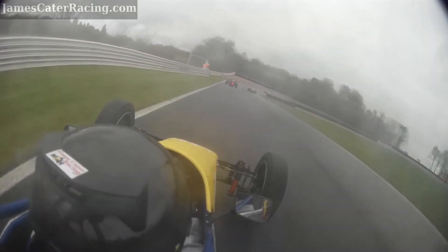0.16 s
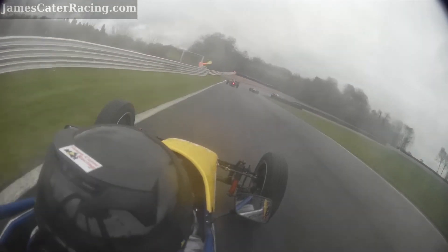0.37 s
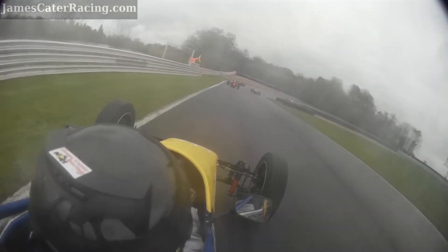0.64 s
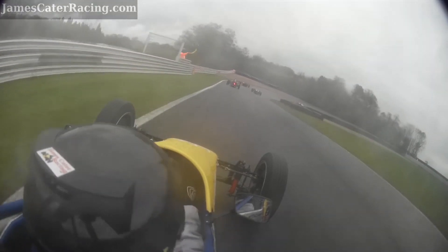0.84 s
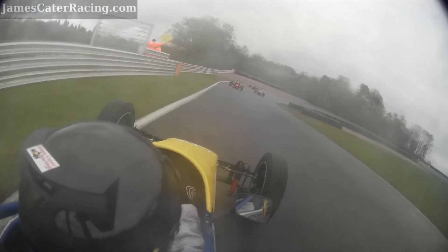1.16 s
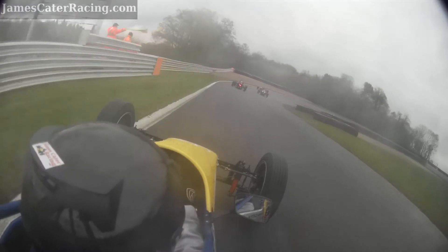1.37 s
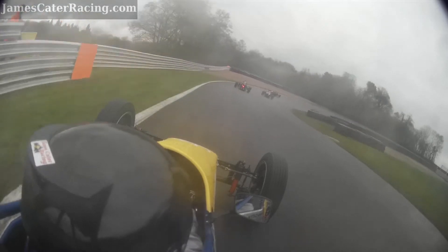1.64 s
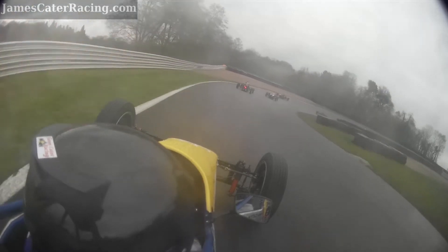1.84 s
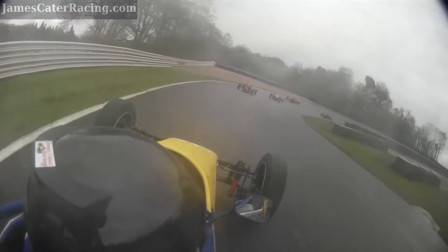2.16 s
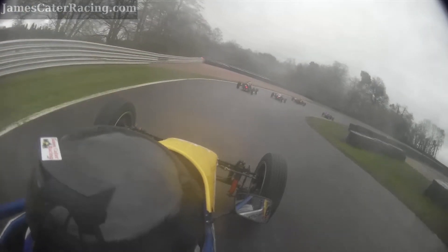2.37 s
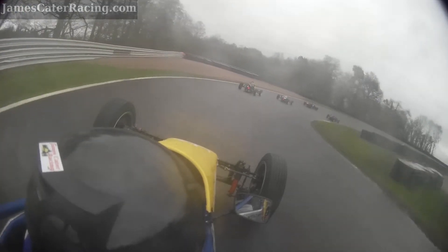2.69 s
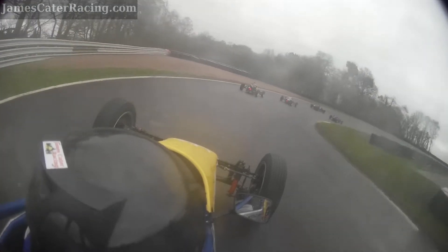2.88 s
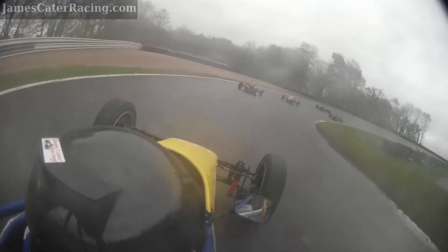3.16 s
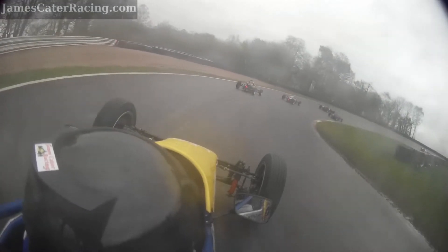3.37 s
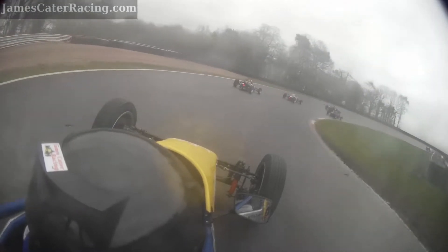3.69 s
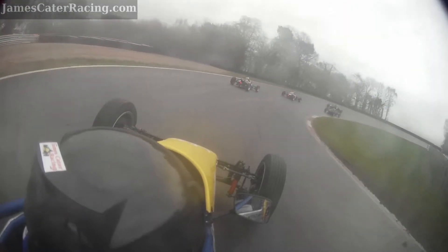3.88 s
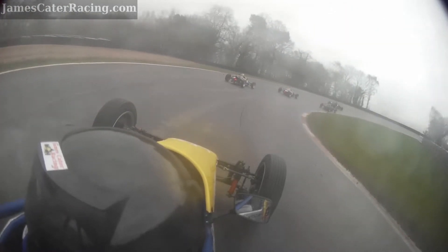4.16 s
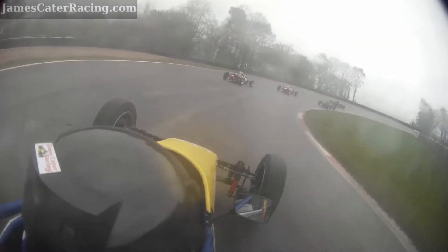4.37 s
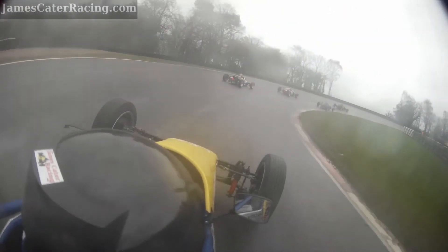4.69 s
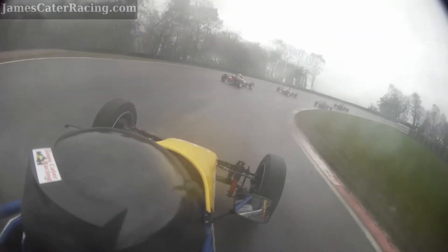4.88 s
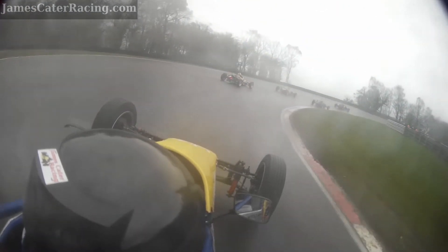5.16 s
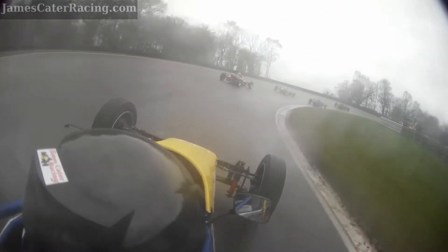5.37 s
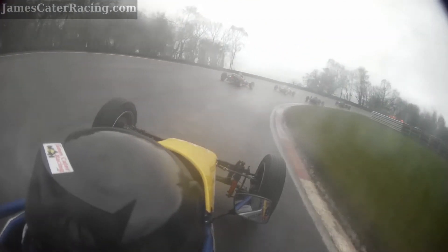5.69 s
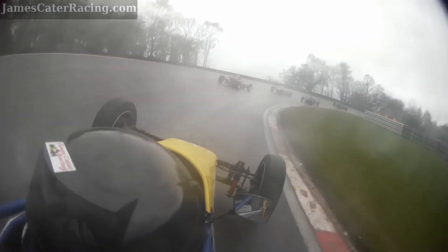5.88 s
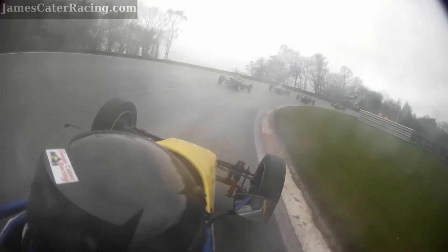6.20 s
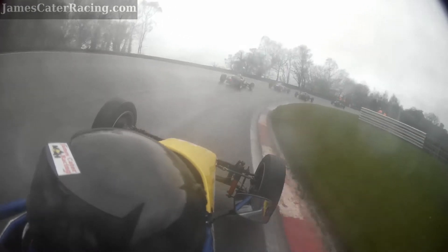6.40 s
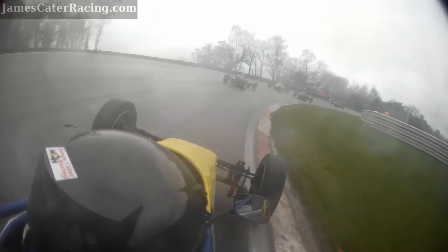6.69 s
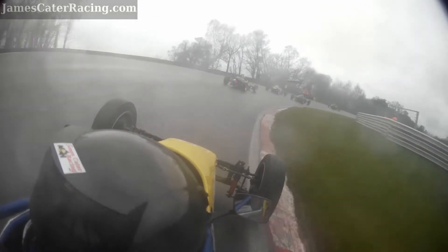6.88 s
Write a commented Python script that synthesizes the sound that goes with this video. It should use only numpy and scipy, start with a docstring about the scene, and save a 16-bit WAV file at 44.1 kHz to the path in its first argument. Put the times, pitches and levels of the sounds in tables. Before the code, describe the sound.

Onboard a single-seater on wet tarmac, a raspy four-cylinder flares, sinks on closed throttle, then growls gradually back up under power.

```python
"""Wet-track single-seater, on board

A four-cylinder air-cooled engine blips for a downshift, runs down on a nearly shut throttle, then pulls out
of the bend. Sine orders locked to the engine cycle ring the mount, frame and a closed camera case.
Resonant noise adds road rumble, frame shake, case buzz, valve hiss and spray; low gusts, knocks and a
grit tick sit around them. Two ports hear it almost alike, apart from the treble."""
import sys
import numpy as np
from scipy import signal
from scipy.fft import rfft, irfft
from scipy.io import wavfile
from scipy.ndimage import uniform_filter1d

SR = 44100
rng = np.random.default_rng(int(sys.argv[2]) if len(sys.argv) > 2 else 0)


def to_wav(sig):
    """Store sig (one row per channel, or 1-D mono) as 16-bit WAV at the path in sys.argv[1].

    Samples outside -1..1 are clipped; the rate is SR.
    """
    pcm = np.clip(np.atleast_2d(sig), -1, 1) * 32767
    pcm = np.round(pcm).astype(np.int16)
    wavfile.write(sys.argv[1], SR, pcm.T)  # frames by channels


N = 310464

# strong engine orders, keyed by multiple of the cycle:
# coasting_db, extra_half_throttle_db, extra_full_throttle_db
STRONG_ORDERS = {4: (-16.5, -1.6, -2.3), 5: (-29.5, 2.5, 3.3), 18: (-25.5, 0.83, 2.6), 22: (-32.5, -1, 1),
                 26: (-21, -8, -1), 30: (-27, -2, 0.), 32: (-27, 1, 1), 43: (-28.5, -5, -4),
                 39: (-24.5, 0., -8), 40: (-24, -8, -9), 6: (-29.5, 2.2, 9.5), 8: (-23.5, 4.3, 8.2),
                 9: (-29, 0., 4.24), 10: (-32, 10.6, 1.6), 11: (-27.5, 0., 0.), 12: (-21, -3.5, 1.8),
                 13: (-28, -1, 9.1), 14: (-31, 10.4, 3.7), 15: (-27, 3.7, 3.9), 16: (-23.5, -12, -2.2),
                 20: (-28.5, 0., 2), 21: (-27, -5, -2), 24: (-26.5, 2.5, -12), 25: (-35.5, 4.6, 0.),
                 27: (-30, -2, 0.), 29: (-24.5, -2, 3), 33: (-20.5, 2, -5)}
# weak orders, first the even (once a turn), then the odd (once a cycle):
# coasting_db, slope_db_per_octave of revs, extra_full_throttle_db
WEAK_ORDERS = [(-35.5, 10, 5), (-31.5, 5.5, -1)]
# how hard some weak orders shake the mount, keyed by multiple of the cycle: extra_db
WEAK_ACCENTS = {3: 4.7, 7: -1.2, 17: -1, 19: -1, 23: 1, 28: 0., 31: 2, 34: 4.3, 35: 3.1, 36: -8, 37: 2.8,
                38: 0, 41: 4.9, 42: -9}
# rev bands where a strong order booms or cancels: order (multiple of the cycle), firing_hz, width_hz, lift_db
REV_BOOMS = [(4, 137, 56, 9), (4, 112, 5, -8.5), (6, 147, 26, 10.5), (9, 144, 10, 7), (32, 108.7, 7.5, 7),
             (30, 108, 6, 3), (8, 143.5, 13.2, 14.5), (8, 138, 4.2, 3.5), (4, 105, 8, 2),
             (9, 115.97, 10, 4), (10, 129.5, 15.3, 11), (11, 139, 21, 5), (12, 130.6, 47, 5.5),
             (13, 130.96, 31.7, 12), (14, 143.3, 21, 14.5), (16, 101, 11, 5), (20, 129.2, 18, 17.5),
             (21, 139, 15, 4), (24, 140.6, 19, 10.5), (29, 113.4, 12.5, 6.5), (12, 160, 7.5, -8),
             (25, 133, 10, 19), (22, 140, 18, 15.5), (22, 122, 14, 13), (32, 100.5, 7.9, 8.5),
             (30, 104, 10, 3), (30, 111, 5, -4), (27, 140, 11, 13.5), (26, 82, 13, 4.5),
             (33, 105.5, 4.4, -9), (29, 108.2, 5, 5), (5, 138, 52, -17), (5, 101.5, 8.2, 4), (32, 98, 4, 3),
             (29, 105.5, 2.7, 2), (33, 102.04, 9, -0.5), (21, 110, 7.4, 5), (27, 100, 14, 9)]
# strong orders lifted by the free blip before the clutch bites, keyed by multiple of the cycle: extra_db
BLIP_LIFTS = {4: 3.5, 8: 6, 9: 8.5, 10: 17, 11: 9, 12: 8, 13: 7, 29: 4, 30: 6, 32: 7, 33: 5}
BLIP_S, BLIP_LENGTH_S = 0.13, 0.081
# where the exhaust drives the frame harder or softer than the road does:
# pitch_hz, width_hz, coasting_db, extra_full_throttle_db
EXHAUST_DRIVE = [(169, 12, 1.5, -3.5), (225, 14, 3.5, -11), (255.5, 17, 1, 3), (356.3, 30, -0.5, 6),
                 (380, 102, 2, -0.5), (671, 80, -3, -3), (775, 97, 2, -1)]
# resonances of chassis and mount: pitch_hz, width_hz, level_db
MOUNT_MODES = [(61, 99, -16), (135.7, 45, -14), (162.5, 36, -8.5), (211.3, 29, -1), (246, 60, -0.5),
               (288, 64, -4.5), (347.6, 54.3, -.5), (436, 153, -14.5)]
# resonances of the frame tubes: pitch_hz, width_hz, level_db
FRAME_MODES = [(590, 54, -14.5), (669.4, 203, -12), (823, 163, -15), (931.5, 104, -18)]
# resonances of the camera case: pitch_hz, width_hz, level_db
CASE_MODES = [(1222, 88, -3.5), (1354, 246, -6), (1612, 210, -3.5), (1798, 156, 1), (2073, 370, -9)]
CASE_PASS_DB = -14.5  # how much of the engine orders the case passes on
BLOCK = 64  # samples between updates of the orders' path


def engine(fire_hz, cycle, throttle, wander_db=2.0, firm_db=0.83, uneven_db=1.77, slip_rad=0.13, loose_rad=0.22):
    """Sines at multiples of the four-stroke cycle, each wandering in level and phase, ring the structure."""
    t = np.arange(N) / SR
    out = np.zeros(N)
    block_throttle = throttle[::BLOCK]
    for order in range(2, 44):
        drift, wobble = walk(14), walk(9)
        firing_order = order % 4 == 0

        if order in STRONG_ORDERS:
            db, half_db, full_db = STRONG_ORDERS[order]
            drive_db = db + np.interp(throttle, [0, .5, 1], [0, half_db, full_db])
            drive_db += (firm_db if firing_order else uneven_db) * wobble
            drive_db += BLIP_LIFTS.get(order, 0) * hump(t, BLIP_S, BLIP_LENGTH_S)
            for boom_order, centre_hz, width_hz, lift_db in REV_BOOMS:
                if boom_order == order:
                    drive_db += lift_db * hump(fire_hz, centre_hz, width_hz)
        else:
            drive_db = law(*WEAK_ORDERS[order % 2], fire_hz, throttle)
            drive_db += WEAK_ACCENTS.get(order, 0) + wander_db * wobble

        hz = order * fire_hz[::BLOCK] / 4
        exhaust_db = sum((db + full_db * block_throttle) * hump(hz, centre_hz, width_hz)
                         for centre_hz, width_hz, db, full_db in EXHAUST_DRIVE)
        through_frame = ring(hz, MOUNT_MODES + FRAME_MODES)
        through_case = undb(CASE_PASS_DB) * ring(hz, CASE_MODES)
        path = np.repeat(np.hypot(through_frame, through_case) * undb(exhaust_db), BLOCK)[:N]

        # the two turns differ in timing: orders between the firing orders sit part of a wave off,
        # and the square term spreads the orders' peaks through the cycle
        start_waves = (0, 3 / 8, 3 / 16, 3 / 8)[order % 4] + order * order / 90
        drift_rad = loose_rad if not firing_order and order < 16 else slip_rad
        phase = 2 * np.pi * (order * cycle + start_waves) + drift_rad * drift
        out += np.sqrt(2) * path * undb(drive_db) * np.sin(phase)
    return out


# resonances that colour the valve hiss: pitch_hz, width_hz, level_db
SHELL_MODES = [(2850, 540, 1.5), (3595, 406, 3.5), (4763, 650, 2.5), (5180, 116, 0.5)]


def structure_shake(cycle, road_db, frame_db, case_db, hiss_db):
    """Road rumble in the mount, shake in the frame, buzz in the case and valve hiss above it."""
    out = shake(cycle, road_db, MOUNT_MODES, throb=0.029, flicker_db=0.3, repeat=.1)
    out += shake(cycle, frame_db, FRAME_MODES, throb=0.088, flicker_db=0.0, repeat=.38, firing=0.7, turn=0.83)
    out += shake(cycle, case_db, CASE_MODES, throb=0.083, flicker_db=0.98, repeat=.33)
    out += shake(cycle, hiss_db, SHELL_MODES, throb=0.13, flicker_db=0.77, repeat=.3, firing=.4, turn=0.53)
    return out


def shake(cycle, level_db, modes, throb, flicker_db, repeat, firing=1, turn=0.3):
    """Noise that throbs with each cycle, turn and firing, part of it repeating, rings a set of resonances."""
    each_turn = turn * np.cos(4 * np.pi * cycle)
    each_firing = firing * np.cos(8 * np.pi * cycle)
    gate = 1 + throb * (np.cos(2 * np.pi * cycle) + each_turn + each_firing)
    # repeat is the share of the noise power that follows the cycle
    drive = np.sqrt(repeat) * clatter(cycle) + np.sqrt(1 - repeat) * rng.standard_normal(N)
    flicker = undb(flicker_db * (walk(22.11) + .5 * walk(6)))
    return undb(level_db) * unit(rung(gate * flicker * drive, modes))


def clatter(cycle, keep=0.91, steps=2048):
    """Valve-gear and gear noise: a pattern replayed each cycle that changes gradually between cycles."""
    fresh = rng.standard_normal((int(cycle[-1]) + 1, steps))
    pattern = signal.lfilter([1], [1, -keep], fresh, axis=0, zi=fresh[:1])[0]
    return unit(pattern.ravel()[(cycle * steps).astype(int)])


# colour of the spray hissing past the case: pitch_hz, width_hz, level_db
SPRAY_MODES = [(5900, 500, 0.5), (7050, 1760, -1), (8700, 900, -11.5), (9920, 1640, -8.5),
               (13200, 960, -50)]


def spray(level_db, flicker_db=0.84):
    """Water thrown up by the tyres: smooth high noise whose level flickers on its own."""
    return undb(level_db + flicker_db * walk(9.5)) * unit(rung(rng.standard_normal(N), SPRAY_MODES))


# short knocks in the frame: start_s, level_db, pitch_hz
FRAME_KNOCKS = [(3.752, -11, 210.1), (4.6005, -10, 790), (5.038, -13, 750.2), (6.763, -16, 800),
                (6.806, -14, 800)]
KNOCK_TURNS = 3.6  # swings in a knock


def knocks():
    """Each knock is a few soft-edged sine swings of a frame tube."""
    t = np.arange(N) / SR
    out = np.zeros(N)
    for start_s, level_db, hz in FRAME_KNOCKS:
        half_s = KNOCK_TURNS / hz / 2
        out += undb(level_db) * hump(t, start_s + half_s, half_s) * np.sin(2 * np.pi * hz * (t - start_s))
    return out


# grit striking the case: start_s, level_db
GRIT_HITS = [(1.3938, -8)]
# what a grain of grit rings: pitch_hz, level_db, t60_s
GRIT_MODES = [(3830, -6, 0.0043), (4900, -9, 0.0022), (7270, -4, 0.0052), (8550, -7, 0.0033),
              (10000, -7, .0025), (11000, -8, 0.0022), (12400, -14, .003)]


def ticks(rise_s=0.0004):
    """A hard grain rings the case as decaying sines for a few milliseconds."""
    out, t = np.zeros(N), np.arange(600) / SR
    tone = sum(undb(db) * np.exp(-np.log(1000) * t / t60_s) * np.sin(2 * np.pi * hz * t)
               for hz, db, t60_s in GRIT_MODES)
    tone *= (t / (t + rise_s)) ** 2  # softened onset
    tone /= np.abs(tone).max()
    for start_s, level_db in GRIT_HITS:
        start = int(start_s * SR)
        out[start:start + 600] += undb(level_db) * tone
    return out


def wind(level_db, gust_db=0.5):
    """Low buffeting on the case: band-passed noise in gusts."""
    band = signal.butter(1, [50, 80], "band", fs=SR, output="sos")
    low = signal.sosfilt(band, rng.standard_normal(N))
    return undb(level_db + gust_db * walk(8.1)) * unit(low)


# engine speed: time_s, firing_hz
ENGINE_REVS = [(0.0, 88.64), (0.06, 91.94), (0.11, 100.9), (0.16, 111.6), (0.2, 127.7), (0.25, 146.7),
               (0.32, 145.7), (0.39, 143.4), (0.55, 139.5), (0.71, 137.4), (0.96, 133), (1.12, 131.5),
               (1.97, 112.2), (2.05, 112.3), (2.13, 110.5), (2.22, 110.1), (2.38, 107.84), (2.48, 105.6),
               (2.63, 103), (2.87, 102.1), (3.19, 98.2), (3.41, 96.76), (3.56, 96.57), (3.67, 97.54),
               (3.75, 96.06), (4.25, 96.94), (4.43, 98.5), (4.52, 98.9), (4.95, 102.6), (5.17, 103.3),
               (5.27, 105.2), (5.38, 104.4), (5.74, 105.7), (6.15, 107.8), (6.45, 109.3), (6.75, 111.2),
               (7.02, 112.6)]
# throttle nearly shut through the braking, fed in past the apex: time_s, opening (0-1)
THROTTLE_MOVES = [(0, 0.07), (3.4, 0), (3.9, 0.53), (4.6, 0.66), (5.3, 0.97), (6.2, 0.89), (7.04, 0.9)]
CLUTCH_S = .25  # from here the wheels turn with the engine


def driving():
    """Firing rate, cycle count, throttle, and road speed expressed as a firing rate."""
    fire_hz = curves(ENGINE_REVS)[0]
    throttle = np.clip(curves(THROTTLE_MOVES)[0], 0, 1)
    cycle = np.cumsum(fire_hz / 4) / SR  # four firings a cycle
    wheel_hz = np.where(np.arange(N) / SR < CLUTCH_S, fire_hz[int(CLUTCH_S * SR)], fire_hz)
    return fire_hz, cycle, throttle, wheel_hz


# brief swells and dips of the shake: centre_s, level_db, length_s
SHAKE_JOLTS = [(0.05, -3.5, 0.098), (0.177, -2.5, 0.063), (0.253, 2.5, 0.042), (0.346, -0.5, 0.088),
               (0.55, 0.5, 0.12), (2.173, 0.8, 0.06), (2.395, -2.5, 0.043), (2.82, 2.5, 0.15),
               (3.37, -2, 0.047), (3.7, 2.5, 0.065), (4.132, 2, 0.17), (4.286, -2.5, 0.041),
               (5.47, -1, 0.16)]
# case buzz, valve hiss and spray: base_db, slope_db_per_octave of road speed, extra_full_throttle_db
CASE_LAW = (-29, 10.2, -1.7)
HISS_LAW = (-39.5, 12.1, 1.08)
SPRAY_GROWTH = (-49.5, 11.7, 1.7)
HISS_BITE = .5  # throttle opening from which the hiss gets its full throttle lift
# standing water at the end of the fast approach lifts the spray, then thins
WATER_DB, WATER_FADE_S = 3.5, 1


def shake_levels(throttle, wheel_hz):
    """Jolts, case buzz, valve hiss and spray in decibels, following road speed and throttle."""
    t = np.arange(N) / SR
    jolt_db = sum(db * hump(t, centre_s, length_s) for centre_s, db, length_s in SHAKE_JOLTS)
    case_db = law(*CASE_LAW, wheel_hz, throttle) + jolt_db
    hiss_db = law(*HISS_LAW, wheel_hz, np.minimum(throttle / HISS_BITE, 1)) + jolt_db
    spray_db = law(*SPRAY_GROWTH, wheel_hz, throttle) + WATER_DB * hump(t, 0, WATER_FADE_S)
    return jolt_db, case_db, hiss_db, spray_db


REF_HZ = 100  # firing rate at which levels are given


def law(db, db_per_octave, throttle_db, hz, throttle):
    """A level in decibels that follows speed by the octave and throttle in proportion."""
    return db + db_per_octave * np.log2(hz / REF_HZ) + throttle_db * throttle


def side_noise(frame_db, case_db, hiss_db, spray_db):
    """Faint independent noise in each resonant colour that sets the two ports apart."""
    out = np.zeros(N)
    for level_db, modes in ((case_db - 31.5, CASE_MODES), (hiss_db - 24.5, SHELL_MODES),
                            (spray_db - 29, SPRAY_MODES), (frame_db - 51.5, FRAME_MODES)):
        out += undb(level_db) * unit(rung(rng.standard_normal(N), modes))
    return signal.sosfilt(signal.butter(4, 560, "high", fs=SR, output="sos"), out)


# tone balance of the two ports: pitch_hz, left_minus_right_db
PORT_BALANCE = [(880, 0), (1000, -.6), (2070, -1.2), (3500, -1.1), (4100, -.5), (4800, -1.2), (5600, -.4),
                (7500, 0)]


def ports(mid, apart):
    """Each port tilts the shared vibration by half the balance and takes the side noise in opposite sign."""
    hz = np.fft.rfftfreq(N, 1 / SR)
    balance_hz, balance_db = np.transpose(PORT_BALANCE)
    tilt_db = np.interp(np.log(hz + 1), np.log(balance_hz), balance_db) / 2
    return np.array([irfft(rfft(mid) * undb(way * tilt_db), N) + way * apart for way in (1, -1)])


def undb(db):
    """Decibels to gain."""
    return 10 ** (np.asarray(db) / 20)


def unit(x):
    """Scale to rms 1."""
    return x / np.sqrt(np.mean(x ** 2))


def curves(table):
    """Columns of a time table, one value a sample."""
    s, *columns = np.transpose(table)
    return [np.interp(np.arange(N) / SR, s, column) for column in columns]


def hump(x, centre, width):
    """1 at the centre, falling away on both sides."""
    return np.exp(-(2 * (x - centre) / width) ** 2)


def ring(hz, modes):
    """Gain of a set of steep resonances, summed in power, at the given frequencies."""
    return np.sqrt(sum((undb(db) / (1 + (2 * (hz - centre_hz) / width_hz) ** 2)) ** 2
                       for centre_hz, width_hz, db in modes))


def rung(x, modes):
    """A sound heard through a set of resonances."""
    return irfft(rfft(x) * ring(np.fft.rfftfreq(N, 1 / SR), modes), N)


def walk(rate):
    """Random levels held for 1 / rate seconds, smoothed twice and scaled to rms 1."""
    k = int(SR / rate)
    held = np.repeat(rng.standard_normal(N // k + 1), k)
    return unit(uniform_filter1d(uniform_filter1d(held, k), k)[:N])


# what the track feeds in: time_s, road_rumble_db, frame_shake_db, wind_buffeting_db
TRACK = [(0, -20.5, -18.5, -26), (.15, -19, -17.5, -38), (.3, -18, -22.5, -38), (1.1, -22.5, -24, -34),
         (2, -21.5, -25, -41), (3, -20.5, -23.5, -34), (4, -21.5, -25, -31.5), (4.6, -21, -26, -32.5),
         (5.3, -20.5, -25.5, -38), (5.9, -19, -24, -33.5), (6.5, -16, -23, -33.5),
         (7.04, -15.5, -21, -27.5)]


def scene():
    """All sources sum into one vibration, heard at two slightly different ports."""
    fire_hz, cycle, throttle, wheel_hz = driving()
    jolt_db, case_db, hiss_db, spray_db = shake_levels(throttle, wheel_hz)
    road_db, frame_db, wind_db = curves(TRACK)
    mid = engine(fire_hz, cycle, throttle)
    mid += structure_shake(cycle, road_db, frame_db + jolt_db, case_db, hiss_db)
    mid += spray(spray_db) + knocks() + ticks() + wind(wind_db)
    return ports(mid, side_noise(frame_db, case_db, hiss_db, spray_db))


TOP_HZ = 14600  # upper limit of the microphone chain


def record(dry):
    """The loudest peaks are rounded by a soft limiter and a steep filter cuts the top."""
    rounded = np.tanh(0.34 * dry) / 0.37
    return signal.sosfilt(signal.ellip(10, .2, 90, TOP_HZ, fs=SR, output="sos"), rounded)


dry = scene()
out = record(dry)
to_wav(out)
```